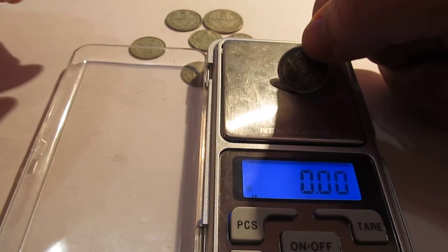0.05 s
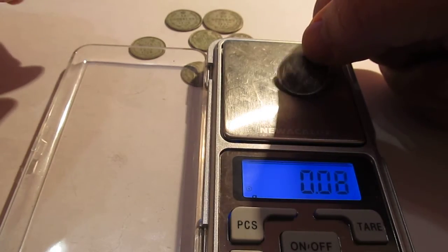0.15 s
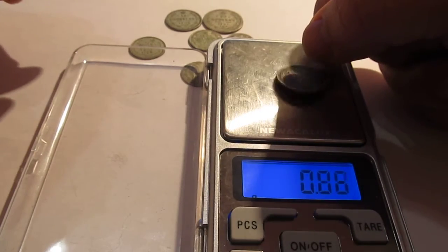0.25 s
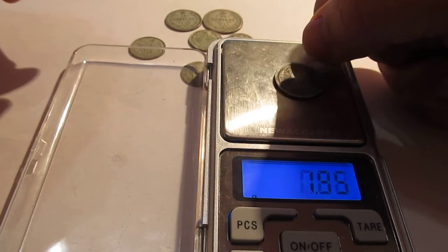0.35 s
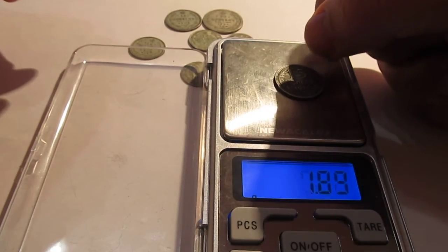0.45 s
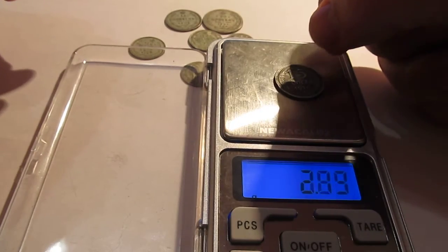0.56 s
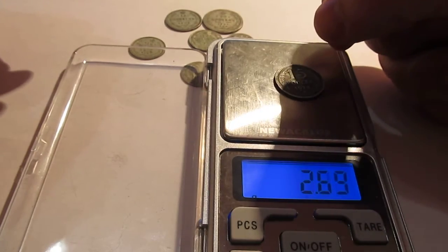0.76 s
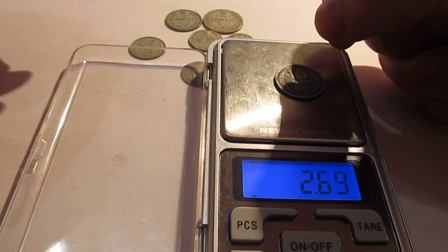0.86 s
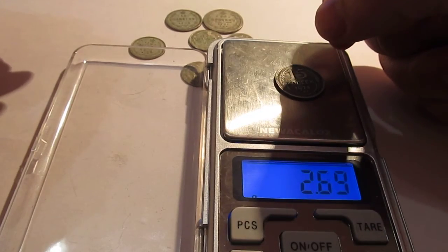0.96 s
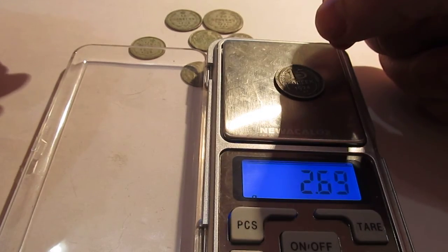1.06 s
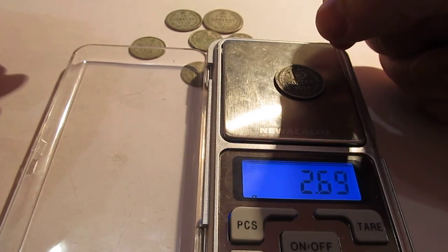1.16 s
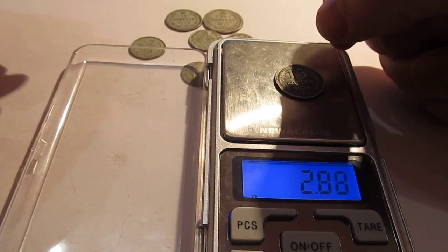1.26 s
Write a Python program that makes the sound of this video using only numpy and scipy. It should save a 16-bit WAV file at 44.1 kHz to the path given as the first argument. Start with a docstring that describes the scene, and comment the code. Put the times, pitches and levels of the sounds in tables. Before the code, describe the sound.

Close by, a coin lands on a small metal weighing plate with a bright clink and rattles faster and faster, settling almost at once. Afterwards only the faint hiss and thin whine of a quiet small room remain.

```python
"""In a small room, close to a camera, a coin drops on the steel pan of a pocket scale.
It rocks from rim to rim in seven ever quicker clatters, each a few contacts, and lies flat.
Each contact makes the pan clack and ring, and the scale's body thuds under each clatter.
Behind it the room murmurs and the camera hisses, whines, hums and ticks faintly."""
import sys
import numpy as np
from scipy import signal
from scipy.fft import rfft, irfft
from scipy.io import wavfile

SR = 44100
rng = np.random.default_rng(int(sys.argv[2]) if len(sys.argv) > 2 else 0)


def unload_wav(signal):
    """Save mono or channel-first audio to the path in sys.argv[1] as 16-bit WAV at rate SR, clipped to [-1, 1]."""
    wavfile.write(
        sys.argv[1],
        SR,
        np.round(np.clip(np.atleast_2d(signal).T, -1, 1) * 32767).astype(np.int16),
    )


N = 57330  # 1.3 s


def amp(db):
    """Turns decibels into a factor to multiply a sound by."""
    return 10 ** (np.asarray(db) / 20)


def unit(x):
    """Scales a sound to an average (rms) level of 1."""
    return x / np.sqrt(np.mean(x ** 2) + 1e-20)


def at_pitch(points, hz):
    """Reads between the rows of a (pitch_hz, value) table, with octaves evenly spaced."""
    pitches, values = np.transpose(points)
    return np.interp(np.log(hz + 1), np.log(pitches + 1), values)


def swell(points):
    """Turns a (time_s, level_db) table into a gain for every sample."""
    return amp(np.interp(np.arange(N) / SR, *np.transpose(points)))


def add(mix, start_s, sound):
    """Mixes a sound in at its start time."""
    part = mix[..., round(start_s * SR):][..., :sound.shape[-1]]
    part += sound[..., :part.shape[-1]]


def pair(a, b, likeness):
    """Makes left and right from two unrelated signals; likeness 1 is equal, 0 is unrelated."""
    likeness = np.clip(likeness, -1, 1)
    return np.array([likeness * a + np.sqrt(1 - likeness ** 2) * b, a])


def shortest_pulse(spectrum_db):
    """The most compact pulse that has this spectrum and is silent before its start."""
    log_gain = np.log(amp(np.r_[spectrum_db, spectrum_db[-2:0:-1]]))
    return np.fft.ifft(np.exp(np.conj(signal.hilbert(log_gain)))).real


def ring(modes, t, weights):
    """A struck object's own tones (modes): sines that each fade by 60 dB in fade_s."""
    return sum(weight * amp(db - 60 * t / fade_s) * np.sin(2 * np.pi * hz * t)
               for (hz, db, fade_s), weight in zip(modes, weights))


def drone(pitch_hz, width_hz, likeness):
    """Noise around one pitch: a wavering tone when narrow, a whirr when wide."""
    peak = 1 / (1 + ((np.fft.rfftfreq(N, 1 / SR) - pitch_hz) / width_hz) ** 2)
    phases = np.exp(2j * np.pi * rng.random((2, len(peak))))
    return unit(irfft(pair(*phases, likeness) * peak, N))


def background():
    """Room murmur and camera hiss, drifting a little in level."""
    # tone colour of the noise: pitch_hz, level_db
    colour = [(20, -18), (50, -3), (100, 2), (150, -2.5), (240, 1.5), (400, -3.5), (700, -7), (1300, -9),
              (1850, -6.5), (2020, -2), (2200, -7), (2650, -0.5), (3020, -9.5), (3850, -1.5), (4400, -13.5),
              (5200, -11), (5480, -5), (6000, -7.5), (6350, -18), (7800, -25), (10800, -16.5),
              (13300, -23.5), (14500, -29), (16000, -57)]
    # how alike left and right are: pitch_hz, likeness
    likeness = [(60, 0.46), (290, 0.78), (700, 0.09), (3000, 0.075), (8000, 0.01)]
    # slow drift of the noise: time_s, level_db
    drift = [(0, -48.5), (.2, -49), (.55, -51.5), (.75, -50.5), (.85, -49.5), (1.0, -48.5), (1.2, -48),
             (1.3, -49)]
    hz = np.fft.rfftfreq(N, 1 / SR)
    white = pair(*rfft(rng.standard_normal((2, N))), at_pitch(likeness, hz))
    noise = irfft(white * amp(at_pitch(colour, hz)), N)
    return unit(noise) * swell(drift)


def camera(whine_hz=2652, hum_hz=207.5, tick_hz=950, tick_s=0.017):
    """The camera's own sounds: a thin whine with a whirr around it, a low hum and dull ticks."""
    # rise and fall of the whine and whirr: time_s, gain_db
    whine_swell = [(0, 2.5), (.7, -1.5), (.85, 5), (1.0, -0.5), (1.1, 4), (1.22, 10.5), (1.3, 0)]
    # faint ticks in the camera: start_s, level_db
    ticks = [(.117, -49), (.615, -54.5), (.813, -50.5), (1.014, -51.5), (1.213, -49.5)]
    whine = amp(-62) * drone(whine_hz, width_hz=4.5, likeness=1.0)
    whirr = amp(-63.5) * drone(whine_hz, width_hz=160, likeness=0.14)
    hum = amp(-63) * drone(hum_hz, width_hz=3.9, likeness=0.82)
    out = (whine + whirr) * swell(whine_swell) + hum
    t = np.arange(0, tick_s, 1 / SR)
    tick_shape = np.sin(np.pi * np.sqrt(t / tick_s)) ** 2  # quick rise, slower fall
    for start_s, level_db in ticks:
        add(out, start_s, amp(level_db) * tick_shape * np.sin(2 * np.pi * tick_hz * t))
    return out


def room_echo(sound, tail_db=-17.5, early_db=-17.5, early_fade_s=0.052, rise_s=0.0044):
    """Early reflections from the table and the room's short tail, different at each ear."""
    # time the room's echo takes to fall by 60 dB: pitch_hz, fade_s
    fade_times = [(200, 0.63), (2000, 0.46), (5000, 0.31), (12000, 0.19)]
    hz, frame_s, spectra = signal.stft(rng.standard_normal((2, SR // 2)), SR, nperseg=256)
    fade = amp(-60 * frame_s / at_pitch(fade_times, hz)[:, None])
    tail = signal.istft(spectra * fade, SR, nperseg=256)[1]
    t = np.arange(tail.shape[1]) / SR
    early = rng.standard_normal(tail.shape) * amp(-60 * t / early_fade_s)
    onset = np.minimum(t / rise_s, 1) ** 2
    echo = (amp(tail_db) * unit(tail * onset) + amp(early_db) * unit(early * onset)) / np.sqrt(len(t))
    return signal.fftconvolve(sound, echo, axes=1)[:, :N]


def finger_scuffs(low_hz=1400, high_hz=2600):
    """Short swells of rubbing noise as the coin leaves the fingers."""
    # soft rubs: start_s, length_s, level_db
    scuffs = [(0.128, 0.031, -43.5), (0.204, 0.017, -39.5)]
    out = np.zeros(N)
    band = signal.butter(2, [low_hz, high_hz], "band", fs=SR, output="sos")
    for start_s, length_s, level_db in scuffs:
        rub = unit(signal.sosfilt(band, rng.standard_normal(N)))[:round(length_s * SR)]
        add(out, start_s, amp(level_db) * rub * np.hanning(len(rub)))
    return out


def body_thuds(rise_s=0.004, hollow_hz=723, hollow_db=-7.5, hollow_fade_s=0.1):
    """The scale's body gives under each clatter and rings low; some landings sound more hollow."""
    # low tones of the body: pitch_hz, level_db, fade_s
    body_modes = [(177.3, 4.5, 0.079), (255.2, 1, 0.18), (326, -3.5, 0.14), (903, -18, .06)]
    # one thud for each clatter: start_s, level_db, extra_hollow_db
    thuds = [(0.228, -38, -10), (0.281, -37, 0.5), (.329, -43.5, -4), (0.369, -45, -12), (.403, -45.5, -6),
             (0.431, -47.5, 8.5), (0.455, -46, 10)]
    out, t = np.zeros(N), np.arange(SR // 3) / SR
    onset = 1 - np.exp(-(t / rise_s) ** 2)
    for start_s, level_db, extra_hollow_db in thuds:
        modes = body_modes + [(hollow_hz, hollow_db + extra_hollow_db, hollow_fade_s)]
        weights = 1 + 0.3 * rng.standard_normal(len(modes))
        add(out, start_s, amp(level_db) * onset * ring(modes, t, weights))
    return out


def clack(treble_db_per_octave, spot_hz, click_db=4, shimmer_db=9.5, shimmer_fade_s=0.02, size=2048):
    """One contact: a sharp click and a brief shimmer of the pan's many close-packed tones."""
    # tone colour of a clack: pitch_hz, level_db
    colour = [(550, -45), (900, -19.5), (1150, -18), (1450, -4.5), (1900, -3.5), (2500, -7.5), (3000, -7),
              (3450, -12), (4200, -4.5), (5200, -9), (6200, -13.5), (7300, -21.5), (8600, -17),
              (10300, -15.5), (13000, -23), (16000, -44)]
    hz, t = np.fft.rfftfreq(size, 1 / SR), np.arange(size) / SR
    spot_db = 12 / (1 + (np.log2((hz + 1) / spot_hz) / 0.52) ** 2)  # a peak about an octave wide
    treble_db = treble_db_per_octave * np.log2(np.maximum(hz / 2000, 1))
    pulse = shortest_pulse(at_pitch(colour, hz) + spot_db + treble_db)
    likeness = 1 / (1 + (hz / 6060) ** 2)  # the treble differs at each ear
    white = rfft(rng.choice([-1., 1.], (2, size)))
    shimmer = irfft(pair(*white, likeness)) * amp(-60 * t / shimmer_fade_s)
    strike = amp(shimmer_db) * unit(shimmer) / np.sqrt(size)
    strike[:, 0] += amp(click_db)
    return signal.fftconvolve(strike, pulse[None], axes=1)


def coin_on_pan(ring_db=-38, low_cut_hz=650):
    """Each contact clacks and rings the pan's tones in a new mix; the small pan gives off no bass."""
    # coin meets pan: start_s, level_db, treble_db_per_octave, spot_hz (strongest pitch at that spot)
    contacts = [(.2254, 7, -4, 1850), (0.2276, -4, -4, 1560), (0.228, -0.5, 6.5, 2430),
                (.2290, -7, 3.5, 2020), (0.229, -8, 9.5, 2300), (0.279, -7.5, 5.5, 2430),
                (0.2812, -2.5, 2, 2470), (0.2828, 1, 4.5, 1840), (0.2857, -7, -0.5, 1810),
                (.2888, -16, -6, 1900), (0.3252, -8.5, 5, 2700), (0.328, 0.5, -10.5, 1640),
                (0.3292, 0.5, 3, 2600), (0.3305, 0.5, 0, 1360), (0.3651, -14.5, 8, 2500),
                (0.3665, -7, 7.5, 1890), (0.3697, 0.5, -0.5, 2130), (0.4005, -6, -5, 1570),
                (0.4017, 1, 3, 1800), (0.4047, -14, -6.5, 2050), (0.4269, -4, -17, 2160),
                (0.4312, -3.5, -9, 1940), (0.4309, -6.5, 4, 2340), (0.4323, -5.5, 1, 2050),
                (.4504, -5.5, 4, 1850), (0.4527, -10.5, 6.5, 2180), (0.4549, -5, 0.5, 2040),
                (0.4588, -15, -6, 2220), (.4625, -12, 4.5, 2200)]
    # tones of the pan with the coin on it: pitch_hz, level_db, fade_s
    pan_modes = [(1402, -6.5, 0.12), (1755, -2.5, 0.2), (1868, -1.5, 0.16), (2043, -4.5, 0.19),
                 (2360, -16, 0.096), (2560, -5, 0.17), (3016, -1.5, 0.077), (3780, -8, 0.075),
                 (4044, 3.5, 0.021), (4813, 2, 0.029), (6200, -30, .03)]
    out, t = np.zeros((2, N)), np.arange(SR // 3) / SR
    for start_s, level_db, treble_db_per_octave, spot_hz in contacts:
        ear_weights = 1 + pair(*rng.standard_normal((2, len(pan_modes))), likeness=0.66)
        ringing = np.array([ring(pan_modes, t, weights) for weights in ear_weights])
        add(out, start_s, amp(level_db) * clack(treble_db_per_octave, spot_hz))
        add(out, start_s, amp(level_db + ring_db) * ringing)
    return signal.sosfilt(signal.butter(2, low_cut_hz, "high", fs=SR, output="sos"), out)


def scene(left_db=-2.5, left_delay_s=0.00004):
    """The scale stands a little to the right; the background and camera are stronger on the left."""
    coin = coin_on_pan() + finger_scuffs()
    thuds = body_thuds()
    delay = np.exp(-2j * np.pi * np.fft.rfftfreq(N, 1 / SR) * left_delay_s)
    left = amp(left_db) * irfft(rfft(coin[0]) * delay, N)
    direct = np.array([left, coin[1]])
    lean_left = amp([[0.75], [-0.75]])
    return direct + thuds + room_echo(coin + thuds) + lean_left * (background() + camera())


def record(dry, ceiling=0.88, top_hz=16300):
    """Flattens any peak above the ceiling, then cuts the highest treble."""
    low_pass = signal.firwin(511, top_hz, window=("kaiser", 9), fs=SR)
    capped = np.clip(dry, -ceiling, ceiling)
    return signal.oaconvolve(capped, low_pass[None], "same")


dry = scene()
out = record(dry)
unload_wav(out)
```